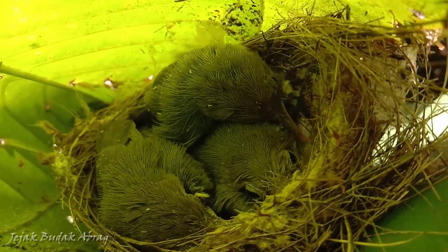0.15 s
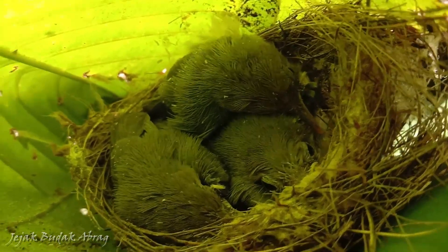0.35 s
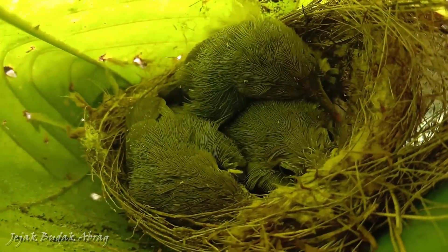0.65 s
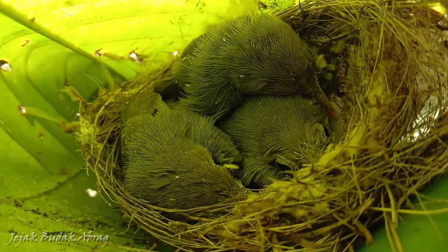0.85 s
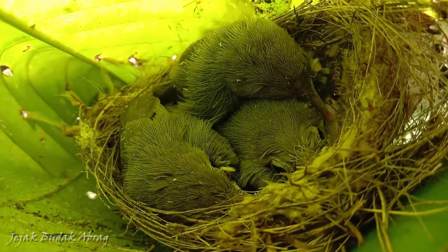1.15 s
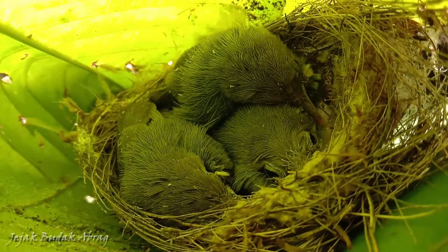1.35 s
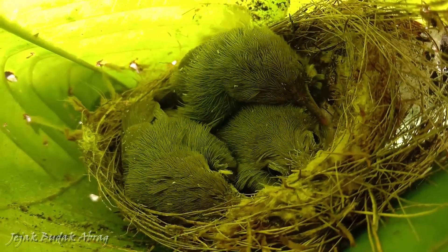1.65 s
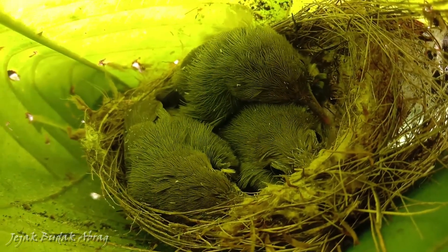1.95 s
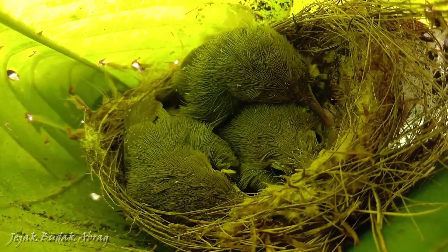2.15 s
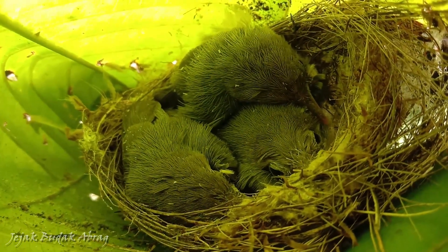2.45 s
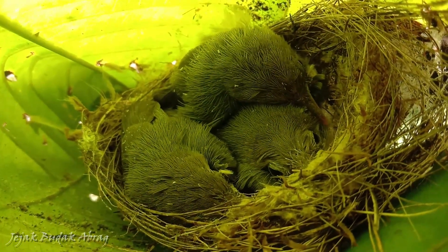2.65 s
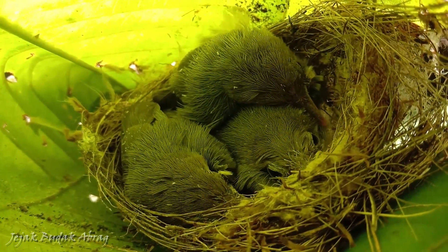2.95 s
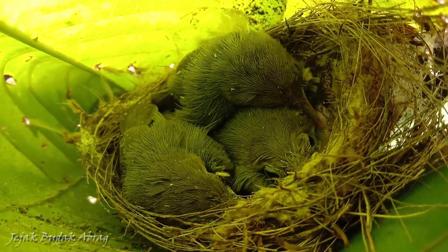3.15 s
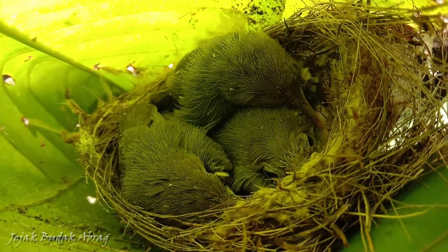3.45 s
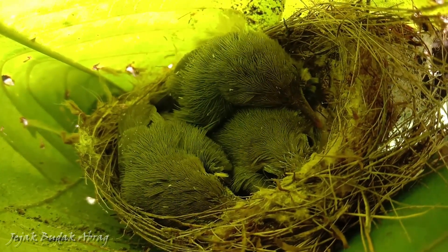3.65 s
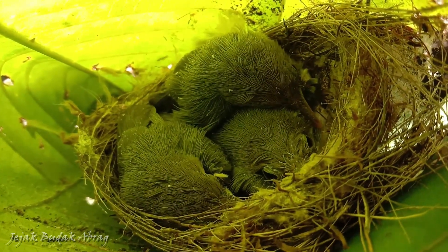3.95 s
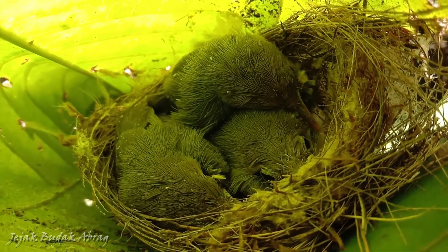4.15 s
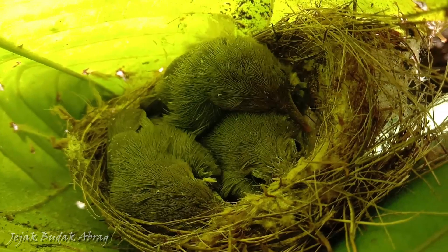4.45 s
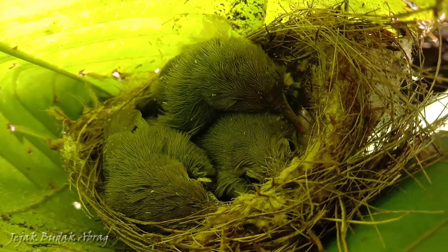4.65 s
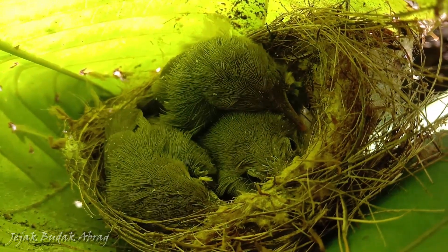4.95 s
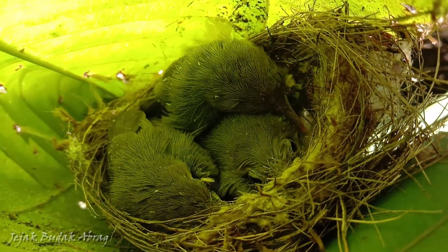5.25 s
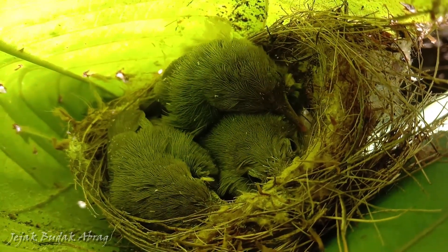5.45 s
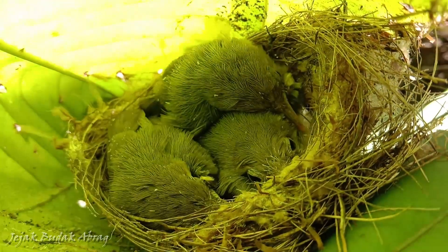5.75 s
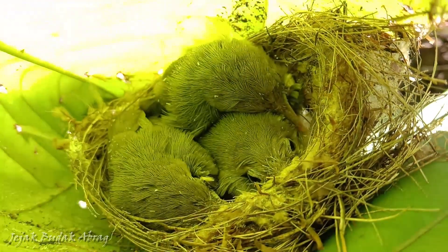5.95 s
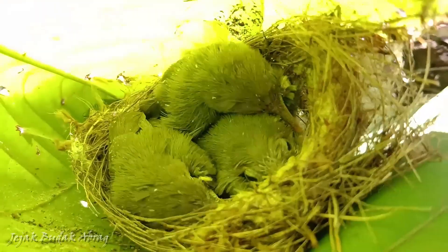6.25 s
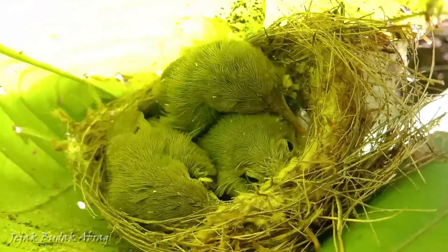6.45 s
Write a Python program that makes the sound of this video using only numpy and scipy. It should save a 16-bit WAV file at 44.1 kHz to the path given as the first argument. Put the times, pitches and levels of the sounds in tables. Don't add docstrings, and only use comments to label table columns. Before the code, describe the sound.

Outdoors at close range in dense foliage, two small birds scold without letting up. Each chirp is very short: a buzzy rising start flipping into a piercing arched whistle, then a grainy scatter off the leaves. From 0 to 2.7 seconds each bird calls about four or five times a second, out of step, making an uneven double chatter. During the first second a hand rustles the leaves, with dry crackles, bright snaps and small woody ticks, one sharper near 0.9; a very high, faint insect trill fades by about 2. From 2.7 one bird carries on alone. Around 3.3 a soft low double knock bumps the handheld microphone. From 3.5 both chirp almost together to the end at 6.6, with light ticks around 4.3 to 4.7 and the faint insect returning. Distant rumble, a barely audible hum, faint far notes, moving air and hiss remain underneath.

```python
import sys
import numpy as np
from scipy import signal
from scipy.fft import rfft, irfft
from scipy.io import wavfile
from scipy.ndimage import uniform_filter1d

SR = 44100
rng = np.random.default_rng(int(sys.argv[2]) if len(sys.argv) > 2 else 0)


def makeup_ratio(level_db):
    decades = np.asarray(level_db, float) / 20
    return 10 ** decades


def materialize(psi):
    bounded = np.clip(np.atleast_2d(psi).T, -1, 1)
    quanta = np.round(bounded * 32767).astype(np.int16)
    wavfile.write(sys.argv[1], SR, quanta)


N = 291501


def colour(x, points):
    hz, db = np.transpose(points)
    bins_hz = np.arange(1, 2050) * SR / 4096
    log_gain = np.interp(np.log(bins_hz), np.log(hz), db) * np.log(10) / 20
    cepstrum = irfft(log_gain)
    cepstrum[1:2048] *= 2
    cepstrum[2049:] = 0
    response = irfft(np.exp(rfft(cepstrum)))
    return signal.fftconvolve(x, response)[:len(x)]


def band(x, lo_hz, hi_hz):
    return signal.sosfilt(signal.butter(2, [lo_hz, hi_hz], "bandpass", fs=SR, output="sos"), x)


def level(x, db):
    return x * makeup_ratio(db) / np.sqrt(np.mean(x ** 2))


def curve(table, column):
    points = np.array(table)
    return np.interp(np.arange(N) / SR, points[:, 0], points[:, column])


def walk(rate):
    k = int(SR / rate)
    held = np.repeat(rng.standard_normal(N // k + 1), k)
    return 1.51 * uniform_filter1d(uniform_filter1d(held, k), k)[:N]


def add(track, sound, s):
    i = int((s + .5) * SR)
    track[i:i + len(sound)] += sound[:len(track) - i]


def bird(chirp, throat, throb, stutter, calls, facing_db, flip_ms, attack_ms, attack_db, breath_db,
         wobble, flutter_db):
    ms, hz, push_db, slope_db = np.transpose(chirp)
    throat_hz, throat_db = np.transpose(throat)
    start_ms, crest_ms, period_ms, depth_db = throb
    lead_start_ms, lead_crest_ms, lead_period_ms, lead_depth_db = stutter
    track = np.zeros(N + SR)
    for s, db, lead_db, lead_ms in calls:
        at = np.where(ms < 0, ms * lead_ms / -ms[0], ms)
        t = np.arange(at[0], at[-1], 1000 / SR)
        chance = rng.standard_normal((3, 4096))[:, :len(t)]
        tremor = uniform_filter1d(uniform_filter1d(chance, 44), 44) * 8
        pitch_scatter = 1 + .005 * chance[2, 0]
        pitch = uniform_filter1d(np.interp(t, at, hz), 66) * pitch_scatter
        phase = 2 * np.pi * np.cumsum(pitch * (1 + wobble * tremor[0])) / SR

        attack = attack_db * np.clip(1 - (t - at[0]) / attack_ms, 0, 1)
        whistling = 1 / (1 + np.exp(start_ms - t))
        leading = 1 / (1 + np.exp(lead_start_ms - t)) - whistling
        source_db = np.interp(t, at, push_db) + attack
        source_db = source_db + depth_db * np.cos(2 * np.pi * (t - crest_ms) / period_ms) * whistling
        lead_swing = np.cos(2 * np.pi * (t - lead_crest_ms) / lead_period_ms)
        source_db = source_db + lead_depth_db * leading * lead_swing

        gains = []
        for k in range(3):
            overtone_db = k * np.interp(t, at, slope_db)
            passed_db = np.interp(np.log((k + 1) * pitch), np.log(throat_hz), throat_db)
            gains.append(makeup_ratio(source_db + overtone_db + passed_db))
        gains[2] = gains[2] * makeup_ratio(facing_db[np.clip(int(s * SR), 0, N - 1)])
        voice = sum(g * np.sin(k * phase) for k, g in enumerate(gains, 1))
        voice = voice + makeup_ratio(breath_db) * sum(gains) * np.diff(chance[2], prepend=0)
        effort_db = db + lead_db / (1 + np.exp(t - 2)) + flutter_db * tremor[1]
        add(track, voice * makeup_ratio(effort_db), s + (at[0] - flip_ms) / 1000)
    return track


# (frequency [Hz], gain [dB])
FAR_TREES = [(2000, -17), (3000, -16), (3800, -27), (4400, 11), (4800, -3), (5500, -6.5), (6300, -20),
             (7400, -9.5), (10000, -12)]


def leaves(voice, cover_db, points, bounces, db, t60, far_db, far_t60, rise_ms, drift):
    t = np.arange(SR) / SR
    glint_db = 3 * np.minimum(rng.exponential(size=SR), 5)
    clump_db = 2 * walk(220)[:SR]
    glints = makeup_ratio(glint_db + clump_db)
    build_up = 1 - np.exp(-(t * 1000 / rise_ms) ** 2)
    near = level(glints, 0) * makeup_ratio(db - 60 * (t / t60) ** 1.05) * build_up
    far = makeup_ratio(far_db - 60 * t / far_t60) * np.clip(t / 0.052, 0, 1)
    echo = []
    for _ in range(2):
        near_echo = colour(rng.standard_normal(SR) * near, points)
        echo.append(near_echo + colour(rng.standard_normal(SR) * far, FAR_TREES))
    margin = (SR // 2, SR // 2)
    turn = drift * np.pad(walk(0.88), margin, mode="edge")
    sent = voice * makeup_ratio(np.pad(cover_db, margin, mode="edge"))
    wet = signal.fftconvolve(sent * np.cos(turn), echo[0])
    wet = wet + signal.fftconvolve(sent * np.sin(turn), echo[1])
    first = sum(makeup_ratio(b_db) * np.roll(voice, int(ms * SR / 1000)) for ms, b_db in bounces)
    return wet[:len(voice)] + first


# (time [s], first bird [dB], mate [dB])
FACING = [(0, 6, 1), (.7, 0, 0.5), (1.4, 6.5, 3.5), (2.1, 2.5, 1), (2.8, 3, 0.5), (3.4, -0.5, 0),
          (3.9, -1, -3), (4.4, 1.5, -4.5), (4.9, 0, 0), (5.4, 2, -0.5), (6, 1.5, 1), (6.61, 1, -1.5)]
# (time [s], first bird [dB], mate [dB])
COVER = [(0, 0.8, -1.8), (.6, -1.2, -0.4), (1.2, 0.8, -0.2), (1.8, 0.5, -0.5), (2.4, -0.6, 0.5),
         (3.1, -1.5, -3), (3.5, 0, 0.1), (4.1, -2, 0.8), (4.8, 0.3, -0.4), (5.4, -0.9, -0.8), (6, 0, -0.5),
         (6.61, -0.5, 1.2)]
# (time from flip [ms], pitch [Hz], effort [dB], slope [dB per partial])
CHIRP_A = [(-26.5, 1949, -53.5, 0), (-10.5, 2320, -41.5, -1.5), (0, 2540, -40.5, 1), (5, 3000, -35, -5.5),
           (9, 3870, -35, 0.5), (12.5, 4450, -49, 8), (15, 4450, -51.5, 9), (18, 3850, -35, -8),
           (21, 3350, -32, -14), (24, 2732, -27.5, -13), (28.5, 2470, -55.5, -8)]
# (frequency [Hz], gain [dB])
THROAT_A = [(2300, -12.5), (3300, 0.5), (4650, 2), (5000, -13), (6750, -19), (7200, -5), (8300, -24),
            (8950, -14), (9900, -47)]
# (start [ms], first crest [ms], period [ms], depth [dB])
THROB_A = (2.2, 8.93, 4.73, 2.45)
# (start [ms], crest [ms], period [ms], depth [dB])
LEAD_PULSE_A = (-12, -9, 5.5, 5)
# (time [s], level [dB], lead against
# whistle [dB], lead length [ms])
CALLS_A = [(-0.125, -5.5, -1, 26), (0.0789, -0.5, 1, 22.3), (0.2989, -1, -0.5, 27.3),
           (0.475, -0.5, 0.5, 24), (0.6721, 2, -0.5, 25.4), (0.8662, 0.5, 1, 27.3),
           (1.0609, 0.5, 1, 24.5), (1.2487, 0.5, -2.5, 28), (1.4511, -1.5, -1, 27.6),
           (1.6584, 0, -2.5, 25.4), (1.8516, -0.5, -0.5, 29.4), (2.06, -0.5, 2, 21.2),
           (2.2453, -0.5, 0.5, 26), (2.435, -2.5, 0.5, 26), (2.6405, 0.5, -2.5, 26),
           (2.8438, 0, 0, 25), (3.0539, 1, -1, 25), (3.2619, -0.5, -0.5, 24.3),
           (3.4861, 0, 1.5, 26.5), (3.6957, 2, -1.5, 25.5), (3.9029, 0.5, -0.5, 23.7),
                   (4.1157, 1, -1, 26), (4.3201, 2, -2, 28), (4.5151, -3.5, -3, 26),
                   (4.7241, 0.5, -1.5, 25.5), (4.9241, -1.5, 3.5, 23.8), (5.12, 0.5, 0.5, 25.5),
                   (5.3356, 1, 2, 25.7), (5.529, -0.5, 2, 23.7), (5.741, 1, 1, 25.5),
                   (5.9447, -1.5, 1, 25.6), (6.136, -1, 1, 27), (6.346, 0.5, 0.5, 25.3),
                   (6.547, -2.5, 5, 19.7)]
# (frequency [Hz], gain [dB])
LEAVES_A = [(2000, 3.5), (2700, -7), (3300, -4), (3800, -6.5), (4400, 2.5), (5000, 3.5), (6000, 10.5),
            (7500, -4.5), (10000, -17.5)]
# (delay [ms], level [dB])
BOUNCE_A = [(3.5, -17), (9, -17), (19, -13)]


def first_parent():
    voice = bird(CHIRP_A, THROAT_A, THROB_A, LEAD_PULSE_A, CALLS_A, curve(FACING, 1),
                 flip_ms=8, attack_ms=4.5, attack_db=-40, breath_db=-31.5, wobble=0.0087, flutter_db=2.5)
    return voice + leaves(voice, curve(COVER, 1), LEAVES_A, BOUNCE_A, db=-28.0, t60=0.31,
                          far_db=-36, far_t60=0.41, rise_ms=7, drift=0.54)


# (time from flip [ms], pitch [Hz], effort [dB], slope [dB per partial])
CHIRP_B = [
    (-14, 1798, -45, -1),
    (-8, 2130, -47.5, 1),
    (-2, 2370, -35, 0),
    (11, 2730, -35, -3),
    (13.5, 3050, -50.5, 7.5),
    (16.5, 3800, -27, -10),
    (22, 4450, -32.5, -15),
    (31.5, 2750, -36, -25),
    (38, 1710, -39.5, -2),
]
# (frequency [Hz], gain [dB])
THROAT_B = [(2000, -14.5), (2700, -4.5), (4200, -12.5), (4750, 3), (6200, -1), (7000, -14.5), (8000, -6.5),
            (8700, -25)]
# (start [ms], first crest [ms], period [ms], depth [dB])
THROB_B = (13, 15.9, 5.07, 2.7)
# (start [ms], crest [ms], period [ms], depth [dB])
STUTTER_B = (-6, -2, 5, 1)
# (time [s], level [dB], lead against whistle [dB], lead length [ms])
CALLS_B = [(-0.06, -6.5, 5.5, 12.7), (0.1561, -0.5, 2, 13.8), (0.3654, -0.5, 1, 17),
           (0.5828, -0.5, -1, 12.9), (0.8245, -1, -0.5, 11.4), (1.0555, -2, 0.5, 11.7),
           (1.274, -1.5, 2, 15.3), (1.4788, -0.5, 1.5, 15.4), (1.7181, -0.5, 1, 12),
           (1.967, -1.5, 2.5, 9.8), (2.2186, -1, 4, 10.8), (2.4427, 0, 0.5, 10.9), (2.695, 0, 1.5, 11.8),
           (3.4795, -2, 5, 11.7), (3.6678, -1, 0.5, 12), (3.8772, 2.5, -3, 11.5), (4.085, 1.5, -1.5, 11.5),
           (4.2937, 0, 0.5, 15.2), (4.5003, 3, 2, 12.2), (4.7012, 0.5, 2.5, 12), (4.9207, 0.5, 1.5, 9.8),
           (5.1395, 1, -0.5, 15), (5.322, 0.5, 2, 11.6), (5.5346, -0.5, 1, 13.2), (5.737, -0.5, 1, 11.6),
           (5.942, 1, 0.5, 15.6), (6.1765, -0.5, 0.5, 12), (6.3977, 0, 0, 13), (6.614, -2, -3, 14)]
# (frequency [Hz], gain [dB])
LEAVES_B = [(2000, -5.5), (2700, -6.5), (3300, 7), (3800, 0), (4400, -3), (5000, -5), (6000, -1.5),
            (7500, -2.5), (10000, -7.5)]
# (delay [ms], level [dB])
BOUNCE_B = [(4.5, -17), (11, -27)]


def mate():
    voice = bird(CHIRP_B, THROAT_B, THROB_B, STUTTER_B, CALLS_B, curve(FACING, 2),
                 flip_ms=1, attack_ms=1.8, attack_db=-3, breath_db=-32.5, wobble=0.0066, flutter_db=2.5)
    return voice + leaves(voice, curve(COVER, 2), LEAVES_B, BOUNCE_B, db=-29.5, t60=0.33,
                          far_db=-32.5, far_t60=0.45, rise_ms=4, drift=0.56)


# (frequency [Hz], gain [dB])
PORT = [(1500, 3.5), (3300, -2.5), (3750, 7), (4150, 3.5), (4650, 5), (5200, 1), (5700, 0), (6250, 9),
        (6680, -2.5), (7350, 7.5), (8200, 1), (9500, -3), (13500, -15), (15100, 3)]
# (frequency [Hz], width [Hz], gain [dB])
RINGS = [(3790, 30, -7), (4240, 60, -2), (4670, 37, -13.5), (4740, 25, -8), (4930, 60, -13),
         (11250, 640, 3.5)]
# (time [s], upper-mid gain [dB])
TILT = [(0, -3.5), (.8, -4.5), (1.6, -7.5), (2.4, -5), (3.2, -2.5), (4, -1), (4.6, 1), (5.3, 3), (6, 1),
        (6.61, 3)]


def birds():
    both = colour(first_parent() + mate(), PORT)[SR // 2:SR // 2 + N]
    both = both + sum(makeup_ratio(db) * band(both, hz - width / 2, hz + width / 2) for hz, width, db in RINGS)
    tilt_db = curve(TILT, 1)
    upper_mid = (makeup_ratio(tilt_db) - 1) * band(both, 5100, 7160)
    treble = (makeup_ratio(0.45 * tilt_db) - 1) * band(both, 6600, 9400)
    return both + upper_mid + treble


# (frequency [Hz], density [dB per Hz])
RUMBLE = [(15, -37), (25, -20), (32, -26), (59, -13), (100, -5.5), (119, 2), (159, 0.5), (260, -14.5),
          (340, -24), (570, -120)]
# (time [s], level [dB])
RUMBLE_SWELL = [(0, -61), (.3, -60), (.8, -64), (1.6, -55.5), (1.8, -62), (2.5, -60), (3.2, -61),
                (3.6, -58.5), (4.4, -59), (4.95, -67), (5.1, -55), (5.4, -60), (5.7, -59.5), (6.61, -58.5)]


def rumble():
    swell = makeup_ratio(curve(RUMBLE_SWELL, 1) + 2 * walk(9))
    return swell * level(colour(rng.standard_normal(N), RUMBLE), 0.071)


# (time [s], level [dB])
HUM_SWELL = [(0.0, -67), (0.03, -60), (0.68, -70.5), (0.72, -76), (0.74, -60.5), (0.96, -73), (2.01, -68),
             (2.15, -76), (2.36, -61), (2.52, -70.5), (4.9, -68), (4.99, -74), (5.03, -61), (5.38, -76),
             (5.45, -64), (5.96, -73), (5.98, -63.5), (6.61, -70)]


def hum():
    noise = rng.standard_normal(N)
    smear = uniform_filter1d(uniform_filter1d([noise, noise[::-1]], size=500), size=500)
    carrier = np.exp(2j * np.pi * np.cumsum(1250 + 18 * walk(8)) / SR)
    waver = np.real(carrier * (smear[0] + 1j * smear[1]))
    return makeup_ratio(curve(HUM_SWELL, 1) + 2.5 * walk(14)) * level(waver, -0.36)


# (time [s], rustle [dB])
HAND = [(0, -10), (.05, 7), (.15, 7), (.3, 4), (.45, -2), (.6, 5.5), (.72, -2), (1.0, -3), (2.4, -4.5),
        (3.2, -1), (4.2, -5), (4.55, 2), (4.9, -2), (5.4, -1), (6.61, -4.5)]


def rustle():
    hand_db = curve(HAND, 1)
    low = level(band(rng.standard_normal(N), 194, 980), -69.5)
    leafy = level(band(rng.standard_normal(N), 1220, 2050), -66.5)
    return makeup_ratio(0.63 * hand_db + 1.5 * walk(7.2)) * low + makeup_ratio(hand_db + 2.5 * walk(30)) * leafy


# (frequency [Hz], density [dB per Hz])
AIR = [(15, -59), (35, -34), (130, -4), (700, -19.5), (1260, -17.5), (1700, -21), (2600, -21),
       (3300, -34.5), (4600, -9), (5600, -24), (6600, -26.5), (7300, -18.5), (9600, -32), (16000, -37)]


def air():
    return level(colour(rng.standard_normal(N), AIR), -58.5)


# (time [s], level [dB])
INSECT = [(0.0, -71), (0.13, -70), (0.42, -72), (0.86, -75), (1.45, -74), (1.67, -79), (1.91, -85),
          (3.54, -81), (4.38, -79), (4.67, -78), (5.25, -76), (5.76, -75), (6.61, -76)]


def insect():
    phase = np.cumsum(19.0 * (1 + 0.063 * walk(3))) / SR
    throb = 0.41 / (1 + np.exp((np.arange(N) / SR - 1.8) / .1))
    strokes = np.exp(throb * np.cos(2 * np.pi * phase))
    strokes = strokes * np.exp(.5 * np.cos(8 * np.pi * phase + 1.4 * walk(6)))
    teeth = band(strokes * rng.standard_normal(N), 14500, 15800)
    return makeup_ratio(curve(INSECT, 1) + 5.0) * level(teeth, 0)


# (time [s], level [dB])
CRACKLE = [(0, -65), (.12, -61), (.35, -60), (.5, -63), (.7, -64.5), (1.0, -69), (1.5, -68), (2, -105),
           (6.61, -65)]


def crackle():
    grain_db, burst_db = 3 * rng.exponential(size=N), 4.5 * walk(140)
    clicks = rng.standard_normal(N) * makeup_ratio(grain_db + burst_db)
    return makeup_ratio(curve(CRACKLE, 1)) * level(band(clicks, 4200, 8600), 0)


# (time [s], level [dB], pitch [Hz], length [s])
NOTES = [(0.023, -64.5, 602, .11), (0.251, -61.5, 594, .1), (4.192, -65, 1250, 0.06),
         (0.573, -64, 2070, 0.071), (0.731, -55, 1230, 0.034), (2.108, -61, 7050, 0.1),
         (4.097, -73, 7560, 0.11), (4.39, -65, 7600, 0.19), (4.76, -64, 7700, 0.1),
         (5.836, -63, 7800, 0.082), (4.188, -66, 863, 0.043)]


def notes():
    track = np.zeros(N + SR)
    for s, db, hz, length in NOTES:
        t = np.arange(int(length * SR)) / SR
        smear = band(rng.standard_normal(SR // 2), hz - 45, hz + 45)[-len(t):]
        tone = np.sin(2 * np.pi * hz * t) + level(smear, 0)
        add(track, level(tone * np.hanning(len(t)) ** 0.16, db), s)
    return track[SR // 2:SR // 2 + N]


# (time [s], peak [dB], pitch [Hz], t60 [s])
TICKS = [(0.032, -55, 1247, .12), (0.04, -50.5, 1484, 0.11), (0.108, -48, 1570, 0.065),
         (0.127, -49, 950, .03), (0.19, -52, 1800, .03), (0.225, -56, 1250, 0.071),
         (0.2514, -51, 1510, 0.02), (0.2837, -49, 1410, 0.029), (0.3253, -49, 1490, 0.099),
         (0.3947, -50, 1260, .05), (0.4918, -53, 1250, 0.046), (0.5831, -48, 1300, 0.046),
         (0.616, -46, 1800, .04), (0.655, -54.5, 1250, 0.085), (0.73, -53, 1810, 0.047),
         (0.8825, -39.5, 1560, 0.03), (4.1183, -51, 1800, .03), (4.3277, -53, 1610, .03),
         (4.42, -52, 1320, .03), (4.4258, -43, 1650, 0.035), (4.5323, -52, 1830, .03),
         (4.5516, -47, 1460, 0.033), (4.559, -54, 1285, 0.14), (4.628, -49, 1230, 0.026),
         (4.6698, -45, 1500, 0.036), (4.685, -53, 1210, 0.037)]
# (time [s], peak [dB], pitch [Hz], t60 [s])
SNAPS = [(0.0438, -51, 8550, .015), (0.0992, -54, 11300, 0.01), (0.1705, -50, 9220, .015),
         (0.2513, -48, 8500, 0.01), (0.262, -56, 9900, .01), (0.3381, -52, 9610, 0.013),
         (0.3381, -39, 8100, 0.013), (0.3805, -59, 9500, .008), (0.405, -46, 9050, 0.012),
         (0.417, -53, 9300, .01), (0.4638, -53, 9200, 0.03), (0.478, -55, 8900, .02),
         (0.6754, -52, 9100, .01), (0.8684, -54, 8800, .01), (0.884, -42, 8350, 0.012)]
# (time [s], peak [dB], pitch [Hz], t60 [s])
KNOCKS = [
    (3.256, -44, 276, 0.1),
    (3.295, -54, 332, 0.34),
    (3.335, -44, 154, 0.13),
]


def twigs():
    track, t = np.zeros(N + SR), np.arange(SR // 4) / SR
    for s, db, hz, t60 in TICKS + SNAPS + KNOCKS:
        edge = band(rng.standard_normal(len(t)), 0.74 * hz, 1.22 * hz) / np.sqrt(hz / SR)
        ring = np.sin(2 * np.pi * hz * t) + 0.48 * edge
        onset = 1 - np.exp(-t * hz / 0.49)
        add(track, makeup_ratio(db - 60 * t / max(t60, .002)) * onset * ring, s)
    return track[SR // 2:SR // 2 + N]


def scene():
    mix = birds() + rumble() + hum() + rustle() + air() + insect() + crackle() + notes() + twigs()
    return np.tile(mix, (2, 1))


def top_cut(x):
    return signal.sosfilt(signal.butter(12, 15800, fs=SR, output="sos"), x)


# (frequency [Hz], density [dB per Hz])
HISS = [(15, -43), (25, -18), (137, -7.5), (1040, -13), (1230, -2.5), (1400, -11), (3080, -14.5),
        (4030, -3.5), (4740, -14), (6050, -16), (6740, -30), (14800, -21.5), (16000, -21)]


def record(dry):
    hiss = level(colour(rng.standard_normal(N), HISS), -66.5)
    side = hiss + makeup_ratio(-32) * np.roll(dry[0], 3)
    ports = dry + side * np.array([[1], [-1]])
    top = signal.ellip(10, .2, 80, 15550, fs=SR, output="sos")
    mix = signal.sosfilt(top, ports) - .0004
    return top_cut(mix)


dry = scene()
out = record(dry)
materialize(out)
```